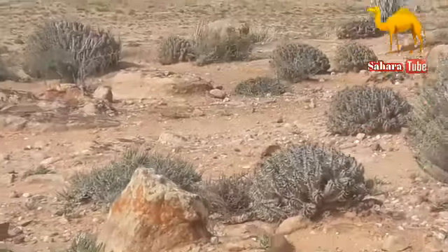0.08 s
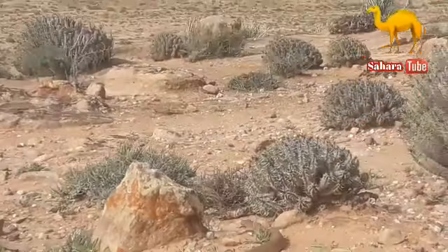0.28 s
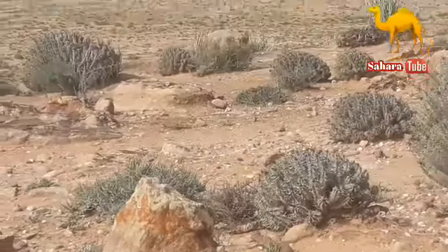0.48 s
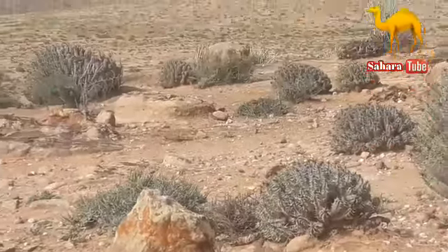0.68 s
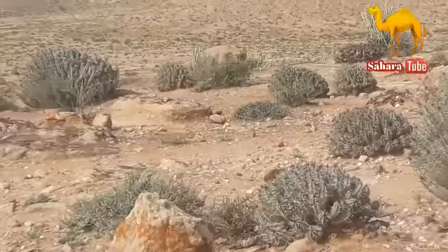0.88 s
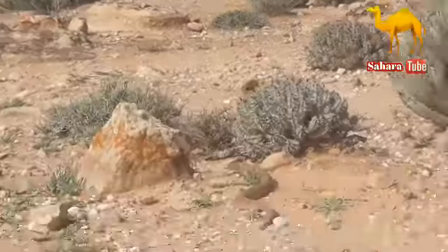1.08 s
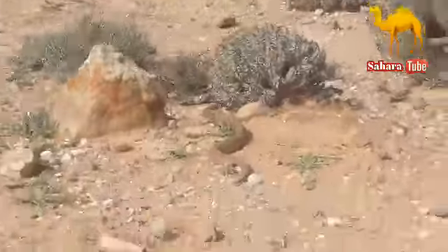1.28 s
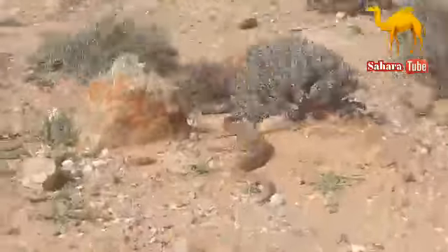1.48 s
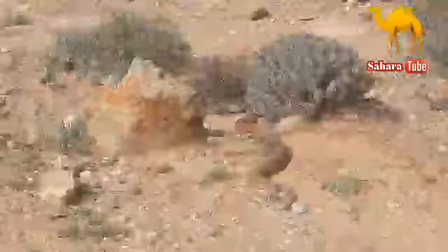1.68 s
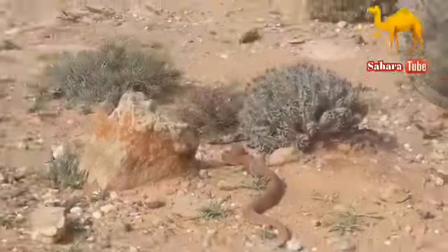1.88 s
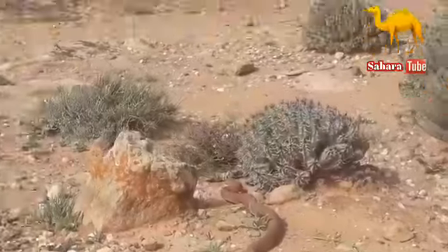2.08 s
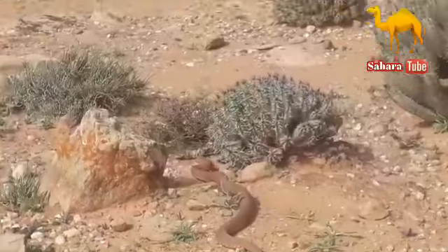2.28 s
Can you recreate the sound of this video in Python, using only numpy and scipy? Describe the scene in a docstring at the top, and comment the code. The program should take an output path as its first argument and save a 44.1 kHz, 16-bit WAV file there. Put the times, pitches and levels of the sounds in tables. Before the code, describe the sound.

A snake hisses one long, thin, high breath with a fast even throb, outdoors in light wind

```python
"""A snake hisses one long, thin, high breath; the hiss throbs very evenly, about 23 times a second.
Light wind rumbles on the microphone, the hand knocks the casing now and then, faint peeps sound far off.
The hiss is shaped noise plus narrow noisy whistles under one breath envelope; wind and still air are
filtered noise, knocks are sums of decaying sines, and peeps are sines with bell-shaped envelopes."""
import sys
import numpy as np
from scipy import signal
from scipy.fft import rfft, irfft
from scipy.io import wavfile
from scipy.ndimage import uniform_filter1d

SR = 44100
rng = np.random.default_rng(int(sys.argv[2]) if len(sys.argv) > 2 else 0)


def generate_wav(signal):
    """Clip the signal to [-1, 1] and save it as 16-bit WAV at the path in sys.argv[1]."""
    frames = np.transpose(np.atleast_2d(signal))
    scaled = np.clip(frames, -1, 1) * 32767
    pcm = np.round(scaled).astype(np.int16)
    wavfile.write(sys.argv[1], SR, pcm)


def attenuation_scalar(level_db):
    """Turn a level in dB into a linear amplitude multiplier (20 dB per decade)."""
    decades = np.asarray(level_db, float) / 20
    return 10 ** decades


N = 105840  # samples


def rms_one(x):
    """Normalisation: mean power is scaled to 1."""
    return x / np.sqrt(np.mean(np.abs(x) ** 2) + 1e-20)


def in_time(rows):
    """Linear interpolation: each column of a time table becomes a curve, sample by sample."""
    s, *columns = np.transpose(rows)
    return [np.interp(np.arange(N) / SR, s, c) for c in columns]


def drift(corner_hz):
    """Low-pass random process: white noise through two equal poles, rms 1, one value per 40 samples."""
    pole = np.exp(-2 * np.pi * corner_hz * 40 / SR)
    white = rng.standard_normal(N // 40 + 2002)
    slow = signal.lfilter([1], [1, -2 * pole, pole * pole], white)[2000:]  # drop the filter's run-in
    return np.interp(np.arange(N) / 40, np.arange(len(slow)), rms_one(slow))


def coloured(spectrum, centres_hz):
    """Spectral shaping: noise of rms 1 in sum, split into bands that cross-fade between the centres."""
    hz = np.fft.rfftfreq(N, 1 / SR) + 1e-3  # keeps the logarithm finite
    point_hz, point_db = np.transpose(spectrum)
    shape = attenuation_scalar(np.interp(np.log(hz), np.log(point_hz), point_db, left=-200, right=-200))
    noise = irfft(shape * rfft(rng.standard_normal(N)), N)
    lines = rfft(rms_one(noise))
    return [irfft(lines * np.interp(hz, centres_hz, row), N) for row in np.eye(len(centres_hz))]


def ring(start_s, db, hz, t60):
    """Damped oscillator: a sine that decays exponentially, 60 dB in t60 seconds, after a soft start."""
    t = np.maximum(np.arange(N) / SR - start_s, 0)
    soft_start = 1 - np.exp(-t * hz * 2)
    return attenuation_scalar(db - 60 * t / t60) * np.sin(2 * np.pi * hz * t) * soft_start


def still_air():
    """Stationary random noise: the steady floor of still air and microphone."""
    # noise spectrum: (frequency [Hz], density [dB per Hz])
    air_spectrum = [(600, -17), (1200, -5), (2000, -6), (3000, -7.5), (4500, -12), (8000, -6.5),
                    (15000, -24.5)]
    level_db = -77.5
    return attenuation_scalar(level_db) * sum(coloured(air_spectrum, [1000, 4000]))


def wind():
    """Turbulent pressure noise: lumpy and low; the upper part follows gusts less, the lowest is steady."""
    # gusts on the microphone: (time [s], level [dB] before the trim)
    gusts = [(0, -71.5), (.2, -70.5), (.35, -65), (.43, -59), (.49, -54.5), (.55, -62), (.63, -60.5),
             (.8, -72.5), (.88, -68.5), (.97, -60.5), (1.06, -63.5), (1.13, -59.5), (1.17, -53.5),
             (1.21, -60.5), (1.3, -53.5), (1.38, -57), (1.53, -61), (1.6, -69), (1.72, -67.5), (1.84, -69),
             (1.97, -62), (2.06, -61), (2.16, -62), (2.24, -69.5), (2.4, -64.5)]
    # wind noise spectrum: (frequency [Hz], density [dB per Hz])
    wind_spectrum = [(12, -56), (20, 0), (27, -26.5), (64, -4), (107, -1), (279, -14.5), (384, -16.5),
                     (430, -19.5), (520, -21), (949, -29.5), (1800, -39.5), (2340, -74), (3960, -120)]
    trim_db, lumps_db, upper_follows = 4.86, 3.5, 0.58
    gust_db, = in_time(gusts)
    mean_db = gust_db.mean()
    sub, deep, low, upper = coloured(wind_spectrum, [28, 60, 150, 340])
    lumps = drift(11.4)  # shared by all but the lowest band
    deep_db = gust_db + lumps_db * (0.5 * lumps + 0.43 * drift(9.9))
    low_db = gust_db + lumps_db * (0.39 * lumps + 0.37 * drift(25))
    smooth_gust_db = uniform_filter1d(gust_db, size=SR // 4)
    upper_db = mean_db + upper_follows * (smooth_gust_db - mean_db + lumps_db * lumps)
    rumble = attenuation_scalar(mean_db + 0.5) * sub + attenuation_scalar(deep_db) * deep + attenuation_scalar(low_db) * low + attenuation_scalar(upper_db) * upper
    return attenuation_scalar(trim_db) * rumble


def peeps():
    """Gaussian-windowed tones: short sines that swell and fade smoothly."""
    # far peeps: (middle [s], length [s], frequency [Hz], peak level [dB])
    calls = [(1.211, 0.014, 3460, -65), (1.431, 0.02, 3550, -69), (1.459, 0.02, 3375, -62.5),
             (1.915, 0.022, 3360, -73), (2.048, 0.012, 3580, -70), (2.14, 0.032, 3390, -80),
             (.075, 0.052, 3430, -80.5), (0.12, .012, 2500, -76), (.22, 0.018, 3500, -79),
             (2.284, 0.02, 3450, -78)]
    t = np.arange(N) / SR
    out = 0
    for middle_s, length_s, hz, db in calls:
        bell = np.exp(-(2 * (t - middle_s) / length_s) ** 2)
        out = out + attenuation_scalar(db) * bell * np.sin(2 * np.pi * hz * t)
    return out


def knocks():
    """Modal decay: contact excites small high ticks and a low thump, then a short hollow ring."""
    # knocks on the casing: (time [s], base level [dB], thump base level [dB], hollow ring [Hz])
    hits = [(0.0289, -40.5, -47, 413), (1.321, -47, -55.5, 222), (1.336, -44.5, -58, 374),
            (1.477, -41.5, -50, 383), (1.492, -44.5, -57, 342), (1.897, -41.5, -49.5, 390),
            (1.911, -44.5, -64, 314), (1.920, -47.5, -66, 350), (2.1003, -43.5, -54.5, 566),
            (2.334, -44, -51.5, 360)]
    # the casing's high rings at contact: (frequency [Hz], level against the base level [dB], T60 [s])
    ticks = [(830, -5, 0.0066), (1160, -0.5, 0.0054), (1920, -12, .004), (3170, -14, 0.0037)]
    thump_hz, thump_t60_s = 114.6, 0.088
    ring_lag_s, ring_cycles = 0.00135, 8  # the hollow ring falls 60 dB in this many cycles
    out = 0
    for s, db, thump_db, hz in hits:
        out = out + ring(s + ring_lag_s, db + 7.5, hz, ring_cycles / hz)
        out = out - ring(s, thump_db + 12, thump_hz, thump_t60_s)
        for tick_hz, tick_db, t60 in ticks:
            out = out - ring(s, db + tick_db, tick_hz, t60)
    return out


def throb():
    """Periodic amplitude modulation: even humps with sharp dips, each a little stronger or weaker."""
    period_s, first_dip_s = 0.04354, 0.035
    dip_floor, sharpness, spread_db = 0.12, 0.96, 1
    turns = (np.arange(N) / SR - first_dip_s) / period_s + 2  # whole numbers fall on the dips
    hump = np.abs(np.sin(np.pi * turns)) ** sharpness
    each_db = spread_db * rng.standard_normal(int(turns[-1]) + 2)[turns.astype(int)]
    return np.sqrt(2) * np.sqrt((hump * attenuation_scalar(each_db)) ** 2 + dip_floor ** 2)


def air_rush(breathy_db, bright_db):
    """Broadband turbulence: shaped noise in ten bands; the breath's brightness acts on the top ones."""
    # broad rush of air: (frequency [Hz], density [dB per Hz])
    rush_spectrum = [(5300, -45), (5450, -17.5), (5900, -10.5), (6300, 5), (7000, -3), (8000, -3.5),
                     (9100, -9), (9900, -4.5), (11500, -6), (12600, -7), (13500, 2), (14100, -28.5),
                     (14600, -27), (15300, -24), (15700, -31)]
    rush_db, patchy_db = -2.5, 0.5
    top_from_hz, top_to_hz = 9600, 13400  # brightness acts from none to full across this range
    centres = np.linspace(5500, 15000, 10)
    out = 0
    for hz, band in zip(centres, coloured(rush_spectrum, centres)):
        share = np.clip((hz - top_from_hz) / (top_to_hz - top_from_hz), 0, 1)
        band_db = rush_db + breathy_db + share * bright_db + patchy_db * drift(19)
        out = out + band * attenuation_scalar(band_db)
    return out


def whistles(bright_db):
    """Narrow-band resonance: each gliding tone is a carrier multiplied by complex low-pass noise."""
    # mouth resonances glide steadily over the whole length, most of them downwards:
    # (start frequency [Hz], end frequency [Hz])
    pitches = [(5160, 5210), (6255, 6200), (6440, 6375), (9935, 9800), (9750, 9110), (9760, 9400),
               (13600, 13250), (14990, 14290), (15450, 15350)]
    # for each: (width [Hz], start level [dB], middle level [dB], end level [dB], share of brightness)
    strengths = [(48.2, -23, -19.5, -15, 0.078), (54, -20, -7, -4.5, 0.3), (57, -6, -6, -11, 0.033),
                 (74, -2, -35.5, -29, 0.086), (78.5, -16, -12, -9.5, 0.08), (79, -40, -10.5, -5.5, 0.12),
                 (83, 3, -6, -27, 1.4), (99, -11.5, -25, -20, .5), (149, -32, -43, -30, 0.071)]
    patchy_db = 1.6
    run = np.arange(N) / N
    out = 0
    for (start_hz, end_hz), (width_hz, *levels_db, bright) in zip(pitches, strengths):
        pole = np.exp(-np.pi * width_hz / SR)
        white = [1, 1j] @ rng.standard_normal((2, N))
        wobble = rms_one(signal.lfilter([1], [1, -pole], white))
        wobble = signal.lfilter([0.08], [1, -0.92], wobble)  # trims the outer skirts
        phase = 2 * np.pi * np.cumsum(start_hz + (end_hz - start_hz) * run) / SR
        patches_db = patchy_db * drift(16) * (3 if start_hz < 5500 else 1)
        gain_db = np.interp(run, [0, 0.5, 1], levels_db) + bright * bright_db + patches_db
        out = out + np.sqrt(2) * attenuation_scalar(gain_db) * np.real(wobble * np.exp(1j * phase))
    return out


def hiss():
    """Source and envelope: rush and whistles share breath, flutter and throb above a sharp lower edge."""
    # the breath: (time [s], effort [dB], brightness added to the top of the hiss [dB],
    # breathiness of the rush against the whistles [dB])
    breath = [(0, -69, -3.5, 2), (.13, -49, -7, -11.5), (.25, -46, -2, -3), (.4, -37, -10.5, -4),
              (.5, -37.5, -5, 0.5), (.58, -35, -2.8, 1.8), (.66, -36, 1, -2), (.73, -40.5, -0.5, 0),
              (.8, -33, -1, -1.9), (.95, -38, 1.2, 3.4), (1.08, -37, -2.5, -3.2), (1.22, -36.5, -2, 0.5),
              (1.4, -39, -2, .1), (1.65, -40.5, 1, -1), (1.9, -43.5, 0.5, -2), (2.0, -44.5, -1, -3.3),
              (2.18, -51, 2.5, .1), (2.4, -57.5, 2, -3.5)]
    flutter_db, flutter_hz = 1.24, 41  # the air stream flutters quickly, all bands together
    edge_hz = 4950  # at least 40 dB down from here downwards
    effort_db, bright_db, breathy_db = in_time(breath)
    source = air_rush(breathy_db, bright_db) + whistles(bright_db)
    envelope = attenuation_scalar(effort_db + flutter_db * drift(flutter_hz)) * throb()
    lower_edge = signal.cheby2(10, 40, edge_hz, "high", fs=SR, output="sos")
    return signal.sosfilt(lower_edge, envelope * source)


def scene():
    """Superposition: the same sound in both channels, with a faint delayed copy of the hiss
    added to one and subtracted from the other, at a randomly varying level."""
    snake = hiss()
    mid = still_air() + wind() + peeps() + knocks() + snake
    side_db = np.minimum(-40 + 14 * drift(8.2), -18)
    side = attenuation_scalar(side_db) * np.roll(snake, 331)  # 7.5 ms late
    return np.array([mid + side, mid - side])


def roll_off(x):
    """The treble ends steeply here."""
    return signal.sosfilt(signal.butter(12, 15730, fs=SR, output="sos"), x)


def record(dry):
    """Identity of the mix: the summed pressure is taken with no further balance or room."""
    return roll_off(dry)


dry = scene()
out = record(dry)
generate_wav(out)
```